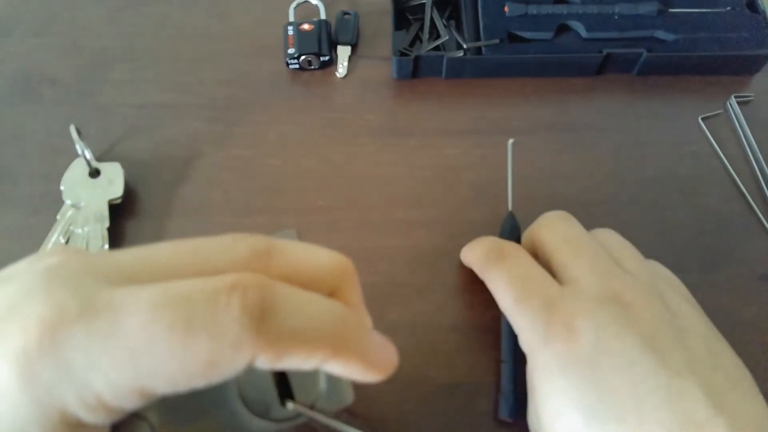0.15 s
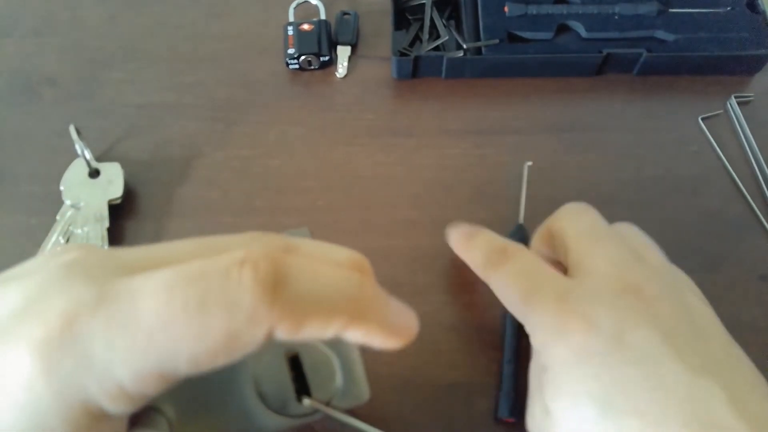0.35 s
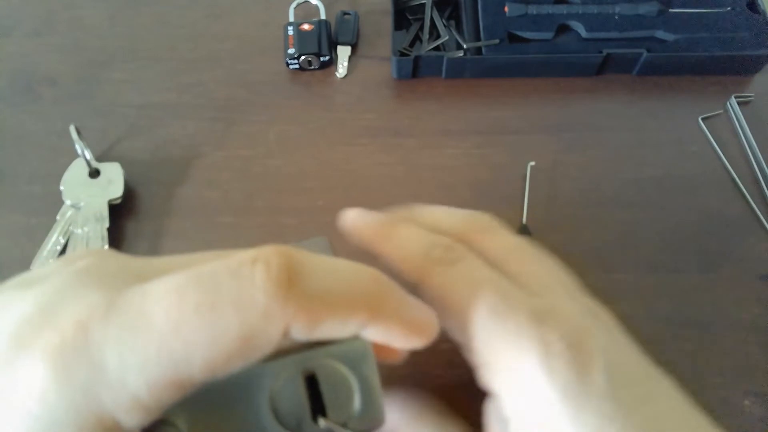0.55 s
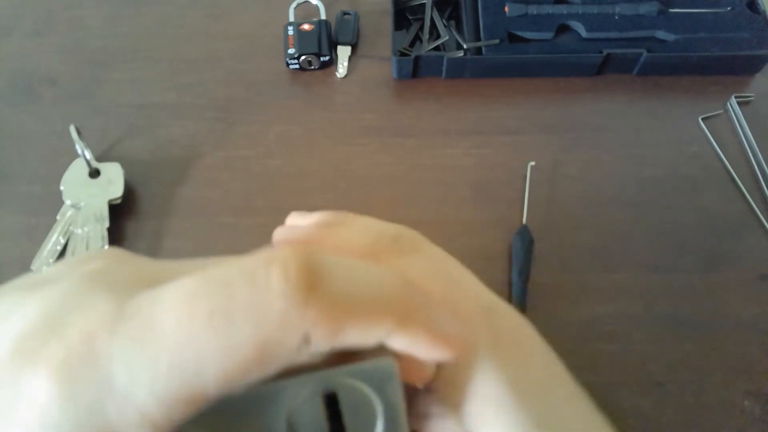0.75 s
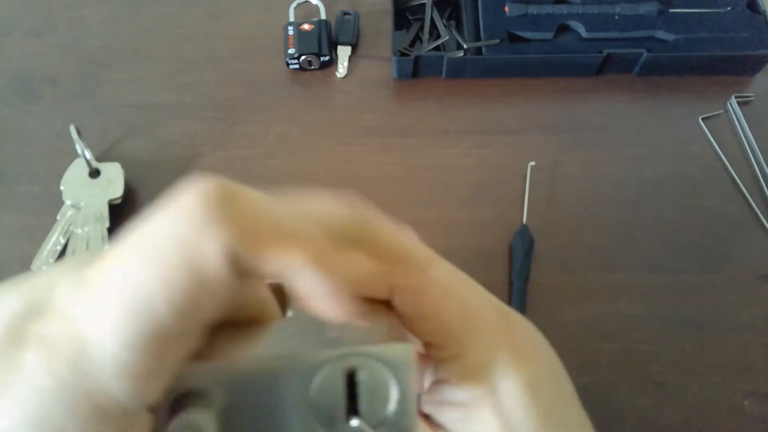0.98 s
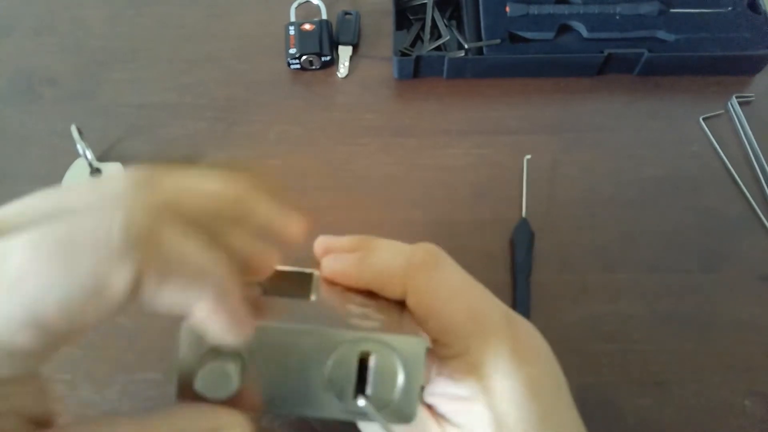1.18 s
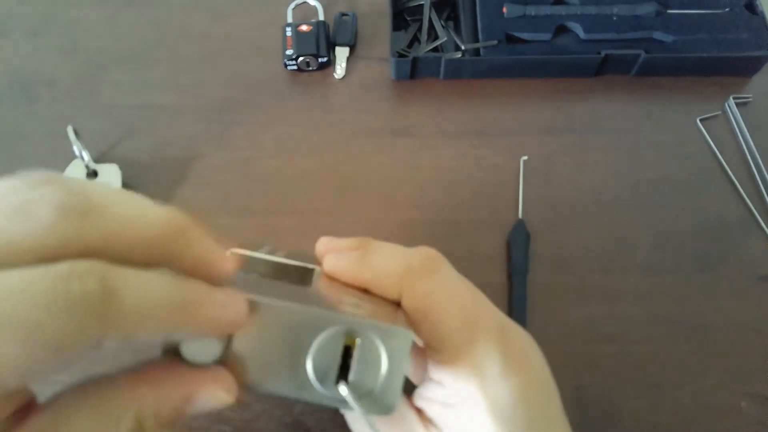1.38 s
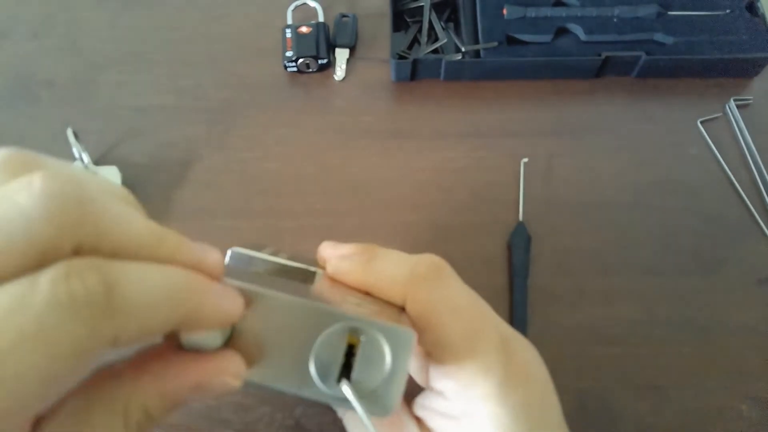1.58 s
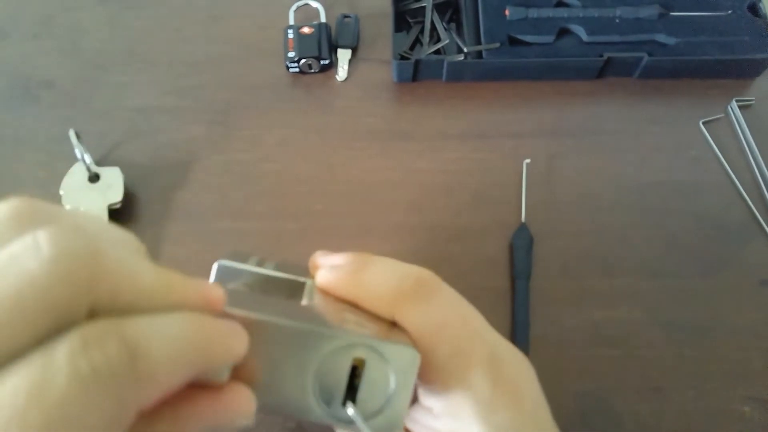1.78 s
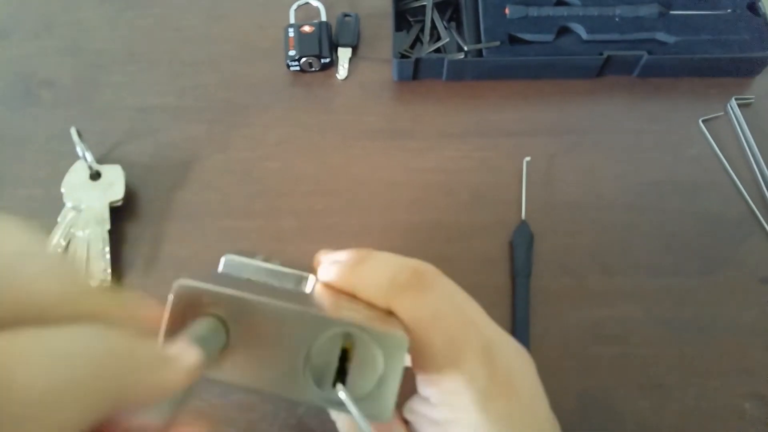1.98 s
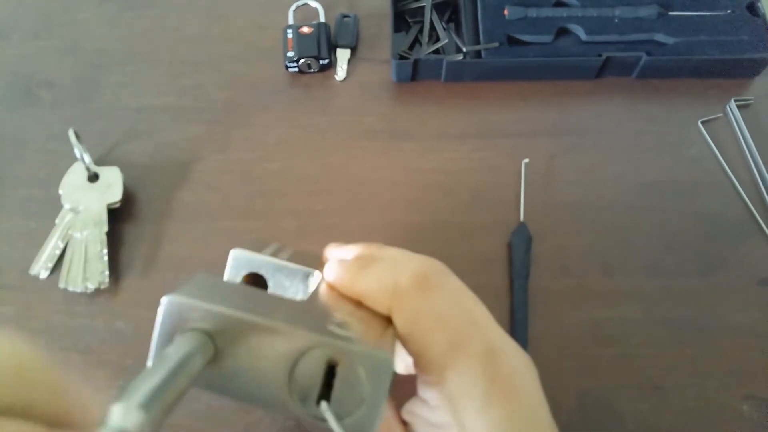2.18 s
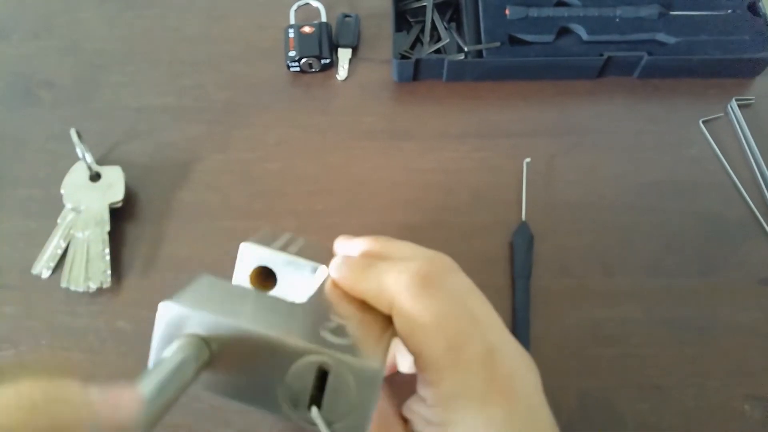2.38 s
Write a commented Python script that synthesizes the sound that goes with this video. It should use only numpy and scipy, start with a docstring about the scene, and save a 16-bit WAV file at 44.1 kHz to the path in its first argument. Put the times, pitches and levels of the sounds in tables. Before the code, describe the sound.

Metal pick knocks and rattles onto wood, followed later by a picked padlock's bright clinking release

```python
"""A low background rush comes first; then a steel lock pick is laid on a wooden table: tip, then handle.
Each knock is a short noise burst plus the decaying sines of table and pick; tiny contacts add a rattle.
Later the picked padlock is pulled open: the bolt clicks, scrapes and slides free with a bright chink.
Its clicks are noise bursts and lock tones, its scrapes dense tiny slips; hands rub and thud softly.
A small, bare room answers pick and lock; one close microphone feeds both channels alike."""
import sys
import numpy as np
from scipy import signal
from scipy.fft import rfft, irfft
from scipy.io import wavfile
from scipy.ndimage import uniform_filter1d

SR = 44100
rng = np.random.default_rng(int(sys.argv[2]) if len(sys.argv) > 2 else 0)


def inscribe(sig):
    """Save sig as 16-bit PCM at rate SR to the path in sys.argv[1].

    A 1-D sig is mono; a 2-D sig holds one channel per row.
    Samples are clipped to [-1, 1] before scaling.
    """
    pcm = np.round(np.clip(np.atleast_2d(sig).T, -1, 1) * 32767)
    wavfile.write(sys.argv[1], SR, pcm.astype(np.int16))


N = 108045  # length of the scene in samples
RING_T = np.arange(SR // 2) / SR  # time within one struck sound (s)


def amp(db):
    """Turns decibels into a gain."""
    return 10 ** (np.asarray(db) / 20)


def evened(x):
    """Scales a sound to rms 1."""
    return x / np.sqrt(np.mean(x ** 2) + 1e-20)


def read(points, hz):
    """Reads a table between its points, along a log-frequency axis."""
    f, value = np.transpose(points)
    return np.interp(np.log(hz + 1), np.log(f + 1), value)


def add(mix, s, sound):
    """Mixes a sound in at time s, cut off at the end of the mix."""
    part = mix[round(s * SR):][:len(sound)]
    part += sound[:len(part)]


def swell(s, length, level_db):
    """A smooth bell-shaped rise and fall around time s, peaking at level_db."""
    t = np.arange(N) / SR
    return amp(level_db) * np.exp(-(2 * (t - s) / length) ** 2)


def colour(x, curve, size=4096):
    """Filters without sounding ahead of the input; the gain in dB is curve(Hz)."""
    hz = abs(np.fft.fftfreq(size, 1 / SR))
    log_gain = np.log(amp(curve(hz)))
    # The Hilbert transform finds the phase that puts the response after time zero.
    taps = np.fft.ifft(np.exp(np.conj(signal.hilbert(log_gain)))).real
    return signal.fftconvolve(x, taps[:size // 2])[:len(x)]


def noise(spectrum):
    """Steady noise of rms 1, shaped by a spectrum table."""
    gain = amp(read(spectrum, np.fft.rfftfreq(N, 1 / SR)))
    return evened(irfft(rfft(rng.standard_normal(N)) * gain, N))


SLIP_SPREAD_DB = 2.5  # unevenness of the contacts, as a standard deviation


def ticks(per_s):
    """A random train of tiny contacts of uneven strength, per_s of them a second on average."""
    happens = rng.random(N) < per_s / SR
    sign = rng.choice([-1, 1], N)
    return happens * sign * amp(SLIP_SPREAD_DB * rng.standard_normal(N))


def crack(spectrum, t60, rise_s):
    """A contact with a dense, quickly dying clatter that excites all frequencies alike before colouring."""
    fade = 1000 ** (-RING_T / t60) * (1 - np.exp(-RING_T / rise_s))
    burst = rng.standard_normal(len(fade)) * fade
    for _ in range(3):  # flatten the spectrum, then fade again
        flat = irfft(np.exp(1j * np.angle(rfft(burst))), len(fade))
        burst = flat * np.sqrt(fade)
    coloured = colour(burst, lambda hz: read(spectrum, hz))
    return evened(coloured) * np.sqrt(np.mean(fade ** 2))


CONTACT_S = 0.00091  # time constant of a ring's rise


def ring(modes, pitch=1, length=1, waver=0):
    """Decaying sines of a struck object; a shifting contact makes each one waver."""
    tones = 0
    for hz, db, t60 in modes:
        drift = evened(uniform_filter1d(rng.standard_normal(len(RING_T)), size=128))
        turns = np.cumsum(hz * pitch * (1 + waver * drift)) / SR
        fade = amp(db - 60 * RING_T / (t60 * length))
        tones = tones + fade * np.sin(2 * np.pi * turns)
    return tones * (1 - np.exp(-RING_T / CONTACT_S))


# spectrum of the background: (frequency [Hz], level [dB per Hz])
RUSH_COLOUR = [(20, 4), (42, -2.5), (166, -8), (382, -14), (649, -17), (4950, -36), (13100, -42),
               (15500, -44)]
RUSH_DB, SUPPRESS_DB = -51.5, 3  # level of the rush; full depth of the noise suppressor


def rush():
    """Steady low noise, raised by the suppressor's full depth to make up for being turned down."""
    return amp(RUSH_DB + SUPPRESS_DB) * noise(RUSH_COLOUR)


# hands shift on the lock: (time of the middle [s], length [s], level [dB])
RUBS = [(1.248, 0.094, -52.5), (2.304, 0.81, -57)]
# sound of rubbing skin: (frequency [Hz], level [dB per Hz])
RUB_COLOUR = [(30, 12), (120, -1), (400, 6.5), (1200, -5.5), (4000, -24), (12000, -30)]
# hands bump and shift on the table: (time of the middle [s], length [s], level [dB])
THUDS = [(0.5, 0.14, -44), (1.805, 0.07, -53.5), (2.116, 0.33, -47.5)]
# dull sound of the bumps: (frequency [Hz], level [dB per Hz])
THUD_COLOUR = [(25, 2), (85, 2.5), (170, -5), (300, -19), (1500, -37.5)]


def hands():
    """Skin rubs softly on the lock and hands thud dully on the table: swelling coloured noise."""
    rubs = noise(RUB_COLOUR) * sum(swell(*row) for row in RUBS)
    thuds = noise(THUD_COLOUR) * sum(swell(*row) for row in THUDS)
    return rubs + thuds


# how long the room rings: (frequency [Hz], time to fall by 60 dB [s])
ROOM_T60 = [(150, 0.48), (500, 0.34), (2000, 0.33), (5000, 0.32), (14000, 0.26)]
# tone of the room: (frequency [Hz], gain [dB])
ROOM_COLOUR = [(150, -7.5), (600, 1), (2000, 0.5), (4000, -5), (8000, -5), (14000, 6)]
ROOM_BUILD_S = .019  # the echoes swell up over this time
ECHOES_PER_S = 1200  # density of reflections once the room has built up; it goes on growing


def room(x):
    """Single reflections thicken into a tail that dies away, the treble first."""
    age = np.arange(SR) / SR / ROOM_BUILD_S
    density = np.clip(ECHOES_PER_S / SR * age ** 2, 1e-6, 1)
    echoes = (rng.random(SR) < density) * rng.choice([-1, 1], SR)
    taps = echoes / np.sqrt(density) * np.minimum(age, 1) ** 2
    hz, t, bands = signal.stft(taps, SR, nperseg=256)
    fade = amp(-60 * t / read(ROOM_T60, hz)[:, None])
    tail = signal.istft(bands * fade, SR, nperseg=256)[1]
    tail = colour(tail / np.linalg.norm(tail), lambda hz: read(ROOM_COLOUR, hz))
    return signal.fftconvolve(x, tail)[:N]


TREBLE_HZ = 9530  # middle of the step up to the top treble


def tint_treble(x, treble_db):
    """Raises or lowers the top treble, making each click or scrape brighter or duller."""
    return colour(x, lambda hz: treble_db * (1 - 1 / (1 + (hz / TREBLE_HZ) ** 10)))


# the bolt scrapes along its bore: (time of the middle [s], length [s], level [dB], extra top treble [dB])
SCRAPES = [(1.978, 0.0069, -45.5, -20), (2.025, 0.031, -46, 8.5), (2.072, 0.061, -46.5, -4.5),
           (2.092, 0.013, -40.5, -28), (2.129, 0.035, -41.5, 17.5), (2.161, 0.066, -54, -15)]
SLIPS_PER_S, SCRAPE_RING_DB = 5000, -10  # average rate of slips; lock ring compared with the grit


def scrape():
    """Tiny dense slips of the bolt make a gritty hiss and keep the lock ringing."""
    slips = ticks(SLIPS_PER_S)
    hiss = evened(colour(slips, lambda hz: read(CLICK_COLOUR, hz)))
    ringing = evened(signal.fftconvolve(slips, ring(LOCK))[:N])
    grit = hiss + amp(SCRAPE_RING_DB) * ringing
    return sum(tint_treble(grit * swell(s, length, db), treble_db) for s, length, db, treble_db in SCRAPES)


# the bolt strikes the lock body: (time [s], level [dB], ring compared with the crack [dB],
# extra top treble [dB], length of crack and ring [share of normal])
CLICKS = [(1.9828, -34, 4, -28, 1.3), (2.031, -48, 0, 2, .8), (2.0865, -42, -8, -20, .6),
          (2.0948, -32, 3, -30, .8), (2.0995, -34, 3, -20, .7), (2.126, -49, -6, 8, .8),
          (2.136, -38, -2, 24, .5)]
# sound of steel on steel, also used for the scrapes: (frequency [Hz], level [dB per Hz])
CLICK_COLOUR = [(100, -5.5), (500, -2.5), (1600, -4.5), (2650, 0), (3200, 1), (4350, 6.5), (4900, -5.5),
                (5900, -9.5), (7600, 0), (9800, -14), (10600, -16), (11150, -3.5), (12200, -19),
                (13900, -17), (14400, -18), (14900, -24)]
# lock body and bolt ring: (frequency [Hz], level [dB], time to fall by 60 dB [s])
LOCK = [(2282, -15, 0.069), (2626, -6, 0.046), (2834, -6.5, 0.059), (3630, 7.5, 0.059), (4060, -9.5, 0.05),
        (4320, -22, 0.074), (5230, -11, .031), (6550, -18, 0.11), (7210, -13.5, 0.078), (9840, -17, 0.033),
        (10800, -7, 0.023)]
CLICK_T60_S, CLICK_RISE_S = 0.054, 0.0008  # normal fade and rise that shape the crack
LOCK_WAVER, SAG_PER_S = .006, 0.063  # rms wobble; loss each second (both shares of the pitch)


def click(s, level_db, ring_db, treble_db, length):
    """Steel on steel, damped by the hand; the ring drops a little as the bolt comes out."""
    pitch = 1 - SAG_PER_S * (s - CLICKS[0][0])
    clack = crack(CLICK_COLOUR, CLICK_T60_S * length, CLICK_RISE_S)
    blow = clack + amp(ring_db) * ring(LOCK, pitch, length, LOCK_WAVER)
    return amp(level_db) * tint_treble(blow, treble_db)


# the pick rattles as it settles: (time of the middle [s], length [s], level [dB])
RATTLES = [(0.244, .04, -47.5), (0.42, 0.025, -36.5), (0.472, 0.018, -39.5)]
RATTLE_PER_S, RATTLE_HZ = 900, 1500  # average contacts a second; lower edge of their sound


def rattle():
    """Between bounces the steel shaft chatters brightly on the wood: tiny contacts with the bass removed."""
    def bright(hz):
        return read(KNOCK_COLOUR, hz) - 20 * np.log10(1 + (RATTLE_HZ / (hz + 20)) ** 2)
    chatter = colour(ticks(RATTLE_PER_S), bright)
    return evened(chatter) * sum(swell(*row) for row in RATTLES)


# the pick meets the table: (time [s], level [dB], brightness [dB per octave],
# ring of the wood [dB], ring of the steel [dB]), both rings on top of the level
KNOCKS = [(.2085, -30.5, -2, -10, 1), (.2315, -34.5, -1, -7, -4), (.246, -40, -1.5, -8, -8),
          (.3803, -18.5, -.5, 2, -12), (.3827, -20.5, 1.5, -12, -14), (.4162, -25.5, -1.5, -12, -3),
          (.4434, -34, -1, -8, -15), (.4646, -27.5, -.5, -6, -16)]
# sound of steel on wood, also used for the rattle: (frequency [Hz], level [dB per Hz])
KNOCK_COLOUR = [(60, -16), (165, -30), (220, 0), (255, -3.5), (340, 7), (520, -4), (750, 3), (1200, -6),
                (1700, -3), (2400, -5), (3700, -5), (4400, -4.5), (4850, -15.5), (5600, -11), (6700, -23.5),
                (7600, -19), (9800, -42), (11300, -23.5), (12300, -38), (15000, -43)]
# table top and handle ring: (frequency [Hz], level [dB], time to fall by 60 dB [s])
TABLE = [(219.8, -16.5, 0.31), (355, -11, 0.29), (423.5, -16.5, 0.2), (607, -16.5, 0.34),
         (703, -21.5, 0.53), (889, -30, 0.16), (1640, -27, 0.31), (1782, -23, 0.32), (1863, -23.5, 0.44),
         (2110, -27.5, 0.3), (2790, -26, .35), (3460, -28, 0.42), (3830, -27, .25)]
# the steel pick rings: (frequency [Hz], level [dB], time to fall by 60 dB [s])
BLADE = [(275, -15, 0.22), (732, -12.5, 0.23), (2270, -19.5, 0.31), (3040, -17.5, 0.29),
         (3463, -16.5, 0.28), (6125, -16.5, 0.25)]
KNOCK_T60_S, KNOCK_RISE_S = 0.029, 0.00025  # fade and rise that shape the clack
LET_GO_S, HELD_RING = .3, .75  # when the fingers let go; share of the ring's length while held
BLADE_WAVER = .002  # rms wobble of the pick's ring (share of its pitch)


def knock(s, level_db, tilt_db, wood_db, steel_db):
    """The pick hits the wood: a clack, and the ring of table and pick; fingers damp the pick until they let go."""
    def tilt(hz):
        return tilt_db * np.log2(np.maximum(hz, 200) / 1500)
    clack = colour(crack(KNOCK_COLOUR, KNOCK_T60_S, KNOCK_RISE_S), tilt)
    length = HELD_RING if s < LET_GO_S else 1
    blade = ring(BLADE, length=length, waver=BLADE_WAVER)
    ringing = amp(wood_db) * ring(TABLE) + amp(steel_db) * blade
    return amp(level_db) * clack, amp(level_db) * ringing


TABLE_WET_DB, RING_WET_DB, LOCK_WET_DB = -0.5, -12.5, -7.5  # sent to the room: clacks, rings, lock


def scene():
    """Pick, padlock and hands in the room, the same in both channels."""
    background = rush() + hands()
    pick, rings, lock = np.zeros(N), np.zeros(N), scrape()
    for s, *row in KNOCKS:
        clack, ringing = knock(s, *row)
        add(pick, s, clack)
        add(rings, s, ringing)
    for s, *row in CLICKS:
        add(lock, s, click(s, *row))
    to_room = amp(TABLE_WET_DB) * pick + amp(RING_WET_DB) * rings + amp(LOCK_WET_DB) * lock
    mono = pick + rings + rattle() + lock + room(to_room) + background
    return np.array([mono, mono])


OPEN_DB, KNEE_DB = 20.5, 8.5  # level over the background where it is half open; softness of the change


def suppress(x):
    """Noise suppressor: turns down every band that is near its background level, so tails end early."""
    bands = signal.stft(x, nperseg=512, noverlap=384)[2]
    power = (abs(bands) ** 2).mean(0)
    for axis in (0, 1):  # smooth over neighbouring bands, then over time
        power = uniform_filter1d(power, size=3, axis=axis)
    level = 10 * np.log10(abs(power) + 1e-20)
    over = level - np.median(level, axis=1, keepdims=True)  # the median is the background
    closed = .5 - .5 * np.tanh((over - OPEN_DB) / (2 * KNEE_DB))
    return signal.istft(bands * amp(-SUPPRESS_DB * closed), nperseg=512, noverlap=384)[1][:, :N]


EDGE_HZ = 15750  # the sound is cut above this


def record(dry):
    """The recorder's noise suppressor and band limit."""
    low_pass = signal.firwin(511, EDGE_HZ, window=("kaiser", 9), fs=SR)
    return signal.oaconvolve(suppress(dry), low_pass[None], "same")


dry = scene()
out = record(dry)
inscribe(out)
```